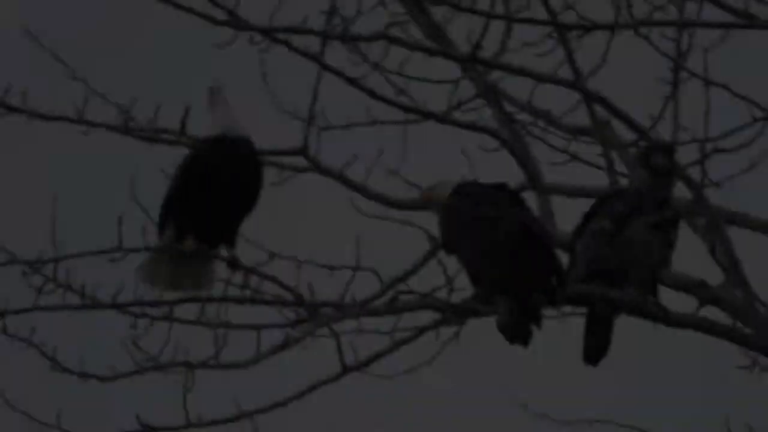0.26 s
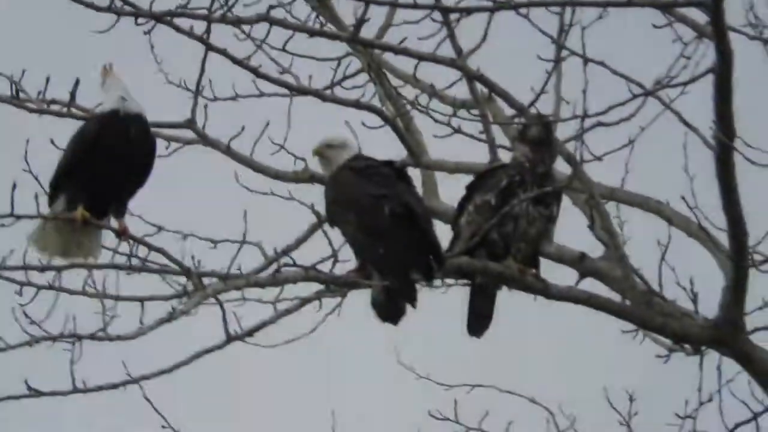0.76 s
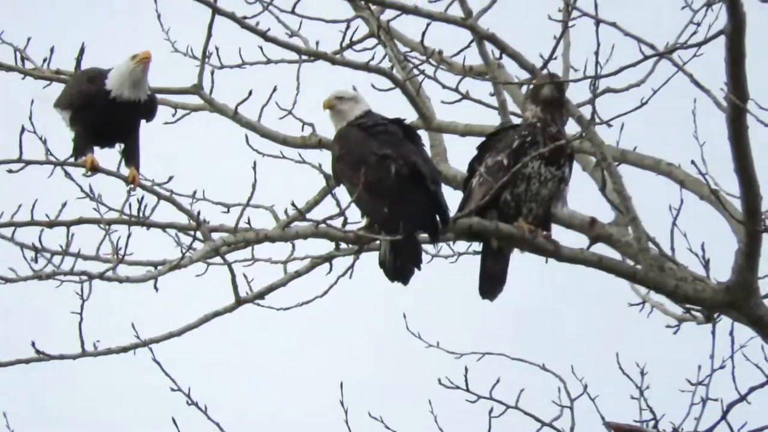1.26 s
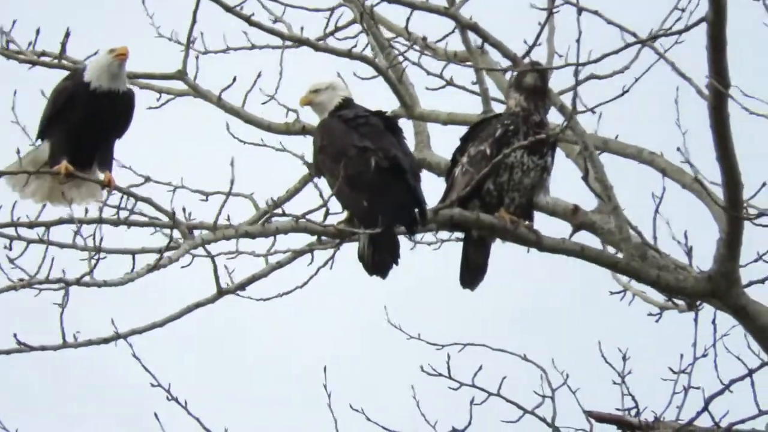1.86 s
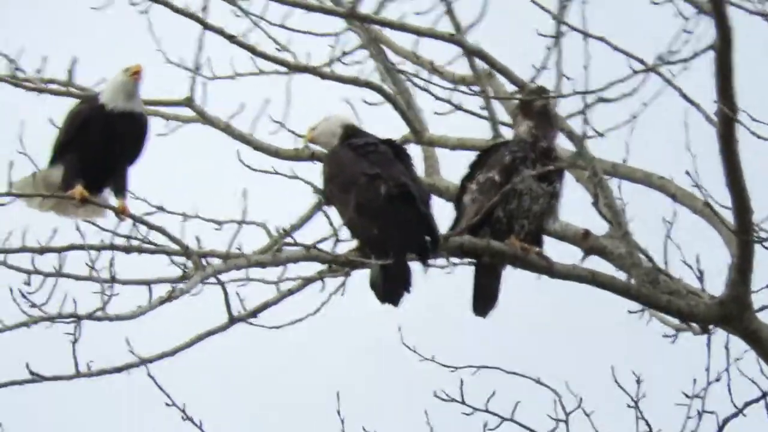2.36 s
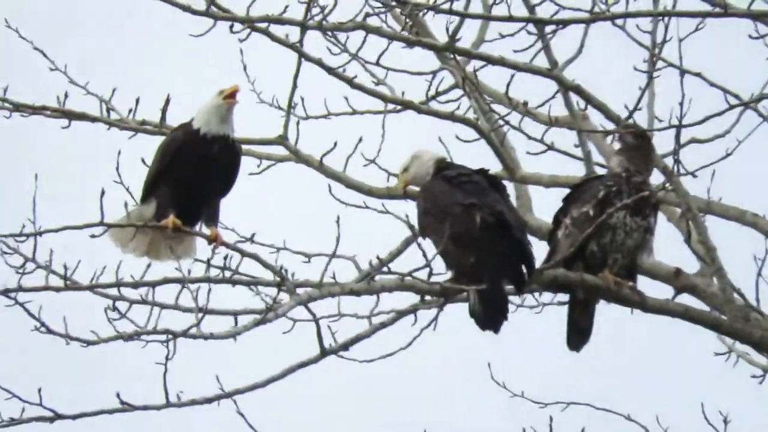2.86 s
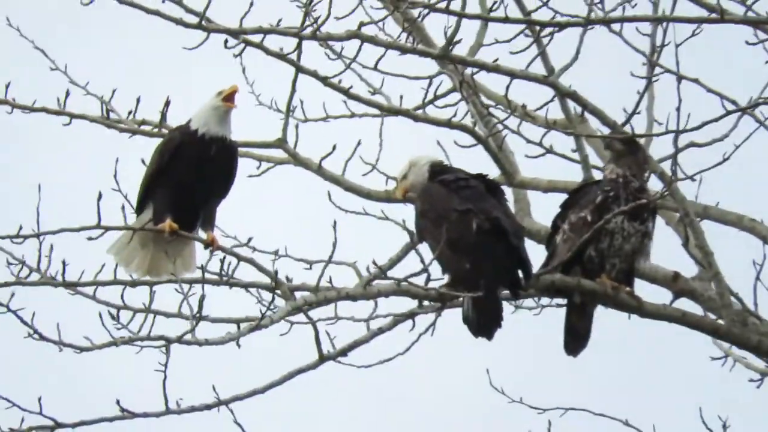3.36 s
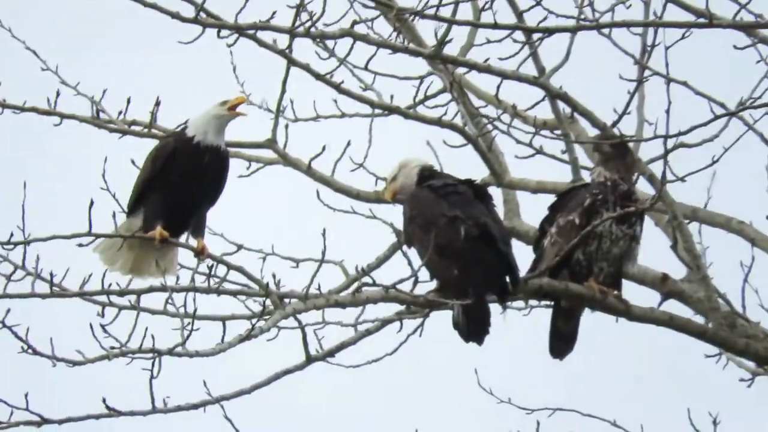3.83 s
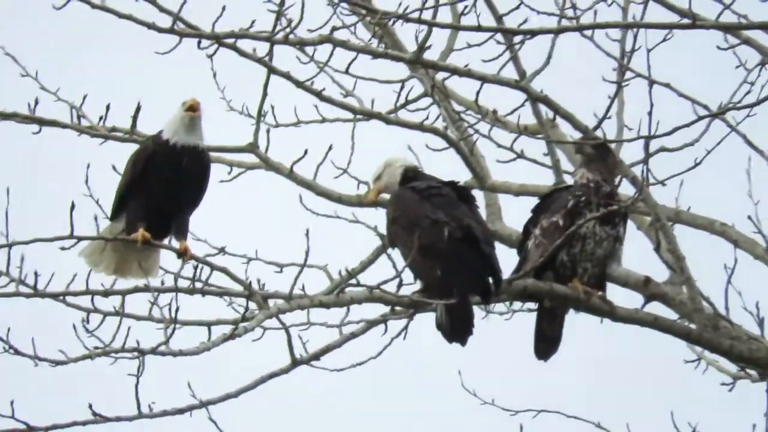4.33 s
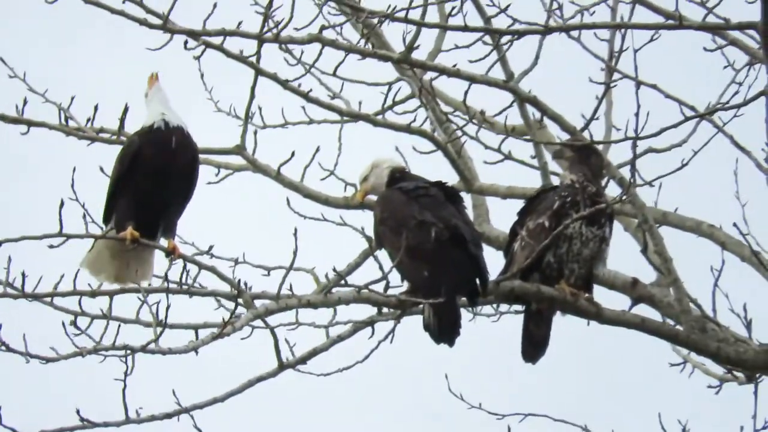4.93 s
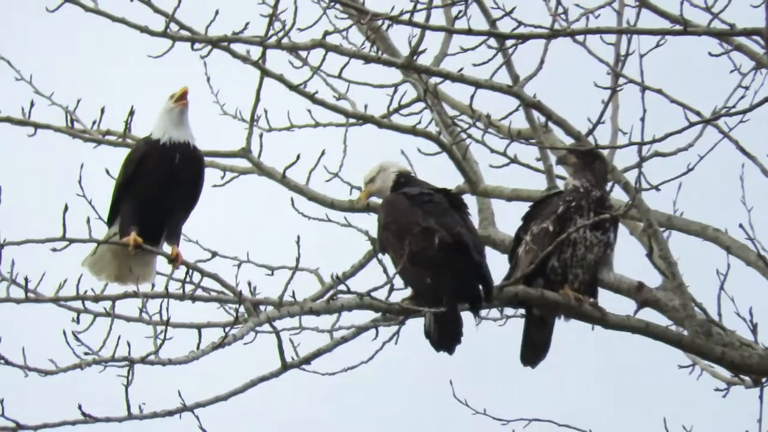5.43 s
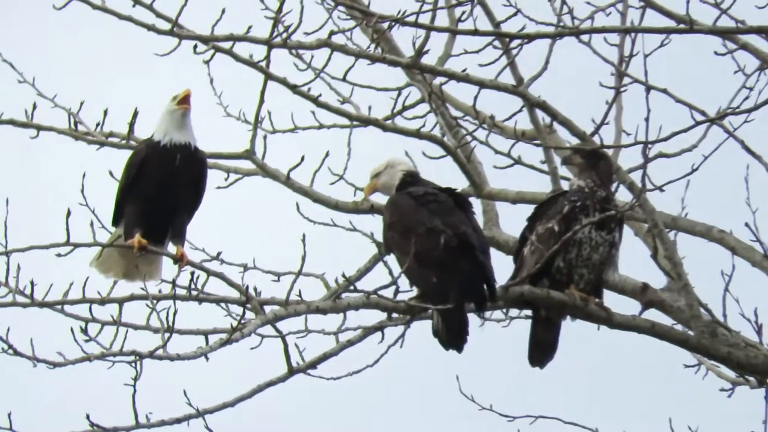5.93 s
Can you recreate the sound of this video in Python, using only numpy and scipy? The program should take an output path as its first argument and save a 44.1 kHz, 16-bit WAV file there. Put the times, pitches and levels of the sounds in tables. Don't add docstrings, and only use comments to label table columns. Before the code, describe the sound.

Silence at first, then from 0.1 to 1.1 s a wide, low distant-traffic roar fades up and holds to the end at about 6 s, with faint engine hum and soft deep throbs swelling irregularly, strongest near 3.5 s and 4.5-5 s. In the centre, a bald eagle begins with faint airy hisses, then short, raspy two-note chirps rising into squeaks at 0.63, 0.86, 1.1 and, loudest, 1.4 s. Only traffic until 3.2 s, when small chirps restart; from 3.6 to 4.25 s comes a dense, loud bout of piercing whistles around 3-4 kHz with a wavering scream at 3.65-3.93 s. Isolated pips follow at 4.4 and 4.7 s. From 4.95 s harder chirps return, clearest at 5.4 s, thinning afterwards. Brief hoarse clucks from a lower bird occur from 3.3 s, mostly after 4.2 s. Notes bounce off nearby trunks with a short, scattered woodland tail.

```python
import sys
import numpy as np
from scipy import signal
from scipy.io import wavfile
from scipy.ndimage import uniform_filter1d

SR = 44100
rng = np.random.default_rng(int(sys.argv[2]) if len(sys.argv) > 2 else 0)


def put_to_file(sound):
    columns = np.atleast_2d(sound).T
    safe = np.clip(columns, -1, 1)
    whole_steps = np.round(safe * 32767)
    wavfile.write(sys.argv[1], SR, whole_steps.astype(np.int16))


def volts_from_db(level):
    exponent = np.asarray(level, float) / 20
    return 10 ** exponent


N = 272979


def read(points, hz):
    f, value = np.transpose(points)
    return np.interp(np.log(hz + 1), np.log(f + 1), value)


def evened(x):
    return x / np.sqrt(np.mean(x ** 2) + 1e-20)


def smoothed_twice(x, size, axis=-1):
    return uniform_filter1d(uniform_filter1d(x, size, axis), size, axis)


def add(mix, s, sound):
    part = mix[round(s * SR):][:len(sound)]
    part += sound[:len(part)]


def resonate(x, hz, width):
    turn = np.exp(2j * np.pi * hz * np.arange(len(x)) / SR)
    r = np.exp(-np.pi * width / SR)
    return 2 * (turn * signal.lfilter([1 - r], [1, -r], x / turn)).real


def road_roar():
    # frequency in Hz, level in dB per Hz.
    road_spectrum = [(15, -32), (25, -13.5), (45, -7.5), (134, -8.5), (215, -8), (353, -9), (565, -14.5),
                     (810, -11.5), (1050, -18), (1750, -28.5), (3000, -32.5), (6000, -41), (11000, -51),
                     (15000, -62)]
    # frequency in Hz, left-right likeness from -1 to 1.
    likeness = [(40, 1.0), (90, 1), (150, 0.6), (290, -0.35), (630, 0.58), (1370, 0.24), (3000, -0.32),
                (8000, -0.2), (13000, -0.49)]
    frames, hz = N // 256 + 5, np.fft.rfftfreq(1024, 1 / SR)
    a, b, c, d, patches = rng.standard_normal((frames, 513, 5)).T
    patches = evened(uniform_filter1d(uniform_filter1d(patches, 14, 0), 16, 1))
    flicker = evened(uniform_filter1d(rng.standard_normal(frames), 8))
    same = np.clip(read(likeness, hz), -1, 1)[:, None]
    left = a + 1j * b
    right = same * left + np.sqrt(1 - same ** 2) * (c + 1j * d)
    level_db = read(road_spectrum, hz)[:, None] + 0.79 * patches + 0.79 * flicker
    spectra = np.array([left, right]) * volts_from_db(level_db)
    roar = evened(signal.istft(spectra, nperseg=1024, noverlap=768)[1][:, :N])
    return roar * volts_from_db(-44)


def engine_hum():
    # frequency in Hz, width in Hz, level in dB.
    drones = [(126.8, 20, -55), (425.8, 9.4, -59.5)]
    return sum(volts_from_db(db) * evened(resonate(rng.standard_normal(N), hz, width)) for hz, width, db in drones)


def engine_throb():
    # moment of passing in seconds, swell time in seconds, level in dB.
    passes = [(1.0, 0.33, -57), (1.64, 0.036, -51), (1.93, 0.24, -48.5), (2.77, 0.096, -46),
              (3.2, 0.21, -52.5), (3.521, 0.057, -40.5), (4.56, 0.097, -44.5), (4.92, 0.039, -45),
              (5.3, 0.086, -52.5), (5.78, 0.02, -51), (6.0, 0.065, -48)]
    idle_db, throb_hz, width_hz = -55, 69.5, 26
    t = np.arange(N) / SR
    throb = resonate(rng.standard_normal(N), throb_hz, width_hz)
    throb = evened(resonate(throb, throb_hz, width_hz))
    swells = sum(volts_from_db(db) * np.exp(-((t - s) / swell) ** 2) for s, swell, db in passes)
    return throb * (volts_from_db(idle_db) + swells)


def traffic():
    return road_roar() + engine_hum() + engine_throb()


def scatter_db(t):
    wood_end_s, stand_s = 0.67, 0.101
    near = volts_from_db(7 - 170 * t)
    beyond_s = np.maximum(t - wood_end_s, 0)
    far = volts_from_db(-7 - 42.5 * t - 68 * beyond_s)
    rows_of_trees_db = 6 * np.cos(2 * np.pi * t / stand_s)
    return 20 * np.log10(np.hypot(near, far)) + rows_of_trees_db


def trees(x):
    # delay in seconds, level in dB.
    trunks = [(.019, -8.5), (.028, -15.5), (0.034, -10), (.061, -16.5), (.069, -16), (.1, -25.5),
              (.128, -25)]
    taps = np.zeros((2, SR))
    at = np.arange(300, SR - 20, 20) + rng.integers(0, 20, (2, (SR - 301) // 20))
    np.put_along_axis(taps, at, rng.choice([-1., 1.], at.shape), 1)
    clumps = evened(smoothed_twice(rng.standard_normal(SR), 300))
    taps = taps + 0.47 * taps[::-1]
    taps *= volts_from_db(5.3 * clumps + scatter_db(np.arange(SR) / SR) - 37.5)
    for delay, db in trunks:
        taps[[0, 1], round(delay * SR) + rng.integers(0, 3, 2)] += volts_from_db(db)
    dull = signal.lfilter(*signal.butter(2, 8500, fs=SR), taps)
    return signal.fftconvolve(x[None], dull, axes=1)[:, :N]


def clucks():
    # start in seconds, length in seconds, pitch in Hz, level in dB, side resonances in dB.
    cluck_rows = [ (3.272, 0.034, 408, -69, 6), (4.198, 0.013, 428, -64, 15), (4.231, 0.0097, 413, -50, 7),
                  (4.248, 0.025, 446, -49.5, 2), (4.425, 0.024, 418, -63, 12),
                  (4.489, 0.011, 429, -61.5, 14.5), (4.758, 0.019, 427, -58, 8),
                  (5.044, 0.0097, 409, -49, 4), (5.254, 0.015, 413, -55.5, 4), (5.295, 0.01, 409, -52, -3),
                  (5.483, 0.012, 412, -53, 3), (5.528, 0.015, 406, -51, -5), (5.758, 0.018, 406, -55.5, 0),
                  (5.964, 0.049, 449, -66, 9.5), (5.996, 0.014, 423, -51, -9), ]
    # frequency in Hz, width in Hz, level in dB.
    mouth = (1699, 256, 11.9)
    # frequency in Hz, width in Hz, level in dB.
    throat = [(1340, 250, 3), (2180, 250, -3), (2620, 250, -8)]
    main, side = np.zeros((2, N))
    for s, length, hz, level_db, side_db in cluck_rows:
        t = np.arange(0, length, 1 / SR)
        folds = sum(np.cos(2 * np.pi * k * hz * t) for k in range(1, 9))
        breath = 1.5 * rng.standard_normal(3000)[:len(t)]
        drive = volts_from_db(level_db) * (folds + breath) * np.hanning(len(t))
        add(main, s, drive)
        add(side, s, drive * volts_from_db(side_db))
    paths = [(main, mouth)] + [(side, mode) for mode in throat]
    return sum(volts_from_db(db) * resonate(resonate(x, hz, width), hz, width) for x, (hz, width, db) in paths)


def syrinx(hz, level_db, window, rasp_hz):
    shake = rng.standard_normal((2, 15000))
    slow = signal.lfilter(*signal.butter(2, max(rasp_hz, 10) / 2, fs=SR), shake)[:, 2000:]
    share = np.clip(rasp_hz / 250, 0, 1)
    swing = np.sqrt(1 - share) + np.sqrt(share / 2) * np.dot([1, 1j], evened(slow))[:len(hz)]
    turn = np.exp(2j * np.pi * np.cumsum(hz) / SR)
    flutter = evened(smoothed_twice(shake[0], 100))[:len(hz)]
    octave = volts_from_db(-34 + 2.5 * (4000 - hz) / 1000 + 4.0 * flutter)
    return np.sqrt(2) * volts_from_db(level_db) * window * (swing * (turn + octave * turn ** 2)).real


def call(s, chip_db, slide_db, squeak_db, squeak_hz):
    # delay in seconds, length in seconds, from Hz, to Hz, rasp in Hz.
    lead_out = (.02, 0.0312, 3560, 3950, 430)
    delay, length, from_hz, to_hz, slide_rasp_hz = lead_out
    clear_db = -45.5
    chip_hz = 3560 + 7.5 * (chip_db - clear_db)
    chip_rasp_hz = 39 + 26 * max(clear_db - chip_db, 0)
    squeak_at, squeak_s, top_hz = s + .031, .06, squeak_hz + 178.4
    return [(s, .023, chip_hz, chip_hz + 30, chip_db, chip_rasp_hz),
            (s + delay, length, from_hz, to_hz, slide_db, slide_rasp_hz),
            (squeak_at, squeak_s, squeak_hz, top_hz, squeak_db, 196),
            (squeak_at + 0.39 * squeak_s, 0.14, top_hz - 40, top_hz, squeak_db - 19, 60)]


def chirps():
    # start in seconds, chip in dB, hoarse slide in dB, squeak in dB, squeak in Hz.
    chatter = [
        (0.633, -55.5, -63, -60.5, 4380),
        (.862, -54, -61, -58, 4420),
        (1.115, -57, -63, -62.5, 4510),
        (1.396, -45, -53.5, -56, 4510),
        (4.981, -55, -59, -58, 4460),
        (5.219, -44.5, -58, -56, 4476),
        (5.425, -38.5, -49, -54.5, 4550),
    ]
    # start in seconds, length in seconds, from Hz, to Hz, level in dB.
    pips = [(1.19, .015, 3490, 3510, -59), (3.248, 0.031, 2610, 2770, -52.5),
            (3.278, 0.021, 2734, 2555, -43), (3.3, 0.17, 2693, 2727, -63.5),
            (3.542, .01, 3680, 3660, -57.5), (3.586, 0.024, 3100, 3250, -53),
            (3.612, .014, 3740, 3640, -56), (3.743, 0.028, 4800, 4720, -36),
            (4.004, 0.0076, 3950, 3670, -33), (4.008, 0.021, 3274, 2810, -39.5),
            (4.2, 0.013, 6300, 4870, -57), (4.408, 0.0095, 3100, 3230, -47),
            (4.708, .015, 3070, 3067, -38.5), (4.758, .11, 3100, 3043, -61.5),
            (4.977, 0.019, 3060, 3210, -50), (5.062, 0.016, 5345, 5380, -56.5),
            (5.082, 0.12, 5380, 5320, -74), (5.09, 0.017, 3840, 4080, -63.5), (5.23, .018, 3150, 3180, -51),
            (5.238, 0.012, 3560, 3560, -46), (5.293, .02, 3940, 3950, -61),
            (5.497, .017, 4100, 3990, -62.5), (5.941, .012, 3200, 3180, -59)]
    # start in seconds, length in seconds, from Hz, to Hz, level in dB.
    creaks = [(.445, 0.03, 7400, 5700, -68), (.458, .04, 5200, 5200, -64), (1.126, 0.026, 3270, 2940, -63),
              (1.131, 0.037, 5230, 5230, -66), (3.282, 0.015, 2530, 2050, -57),
              (3.742, .036, 5180, 5280, -71), (4.958, 0.026, 2900, 3650, -55),
              (5.204, 0.0175, 2490, 3700, -54.5), (5.416, 0.0173, 2820, 3430, -55.5),
              (5.231, 0.013, 5050, 5200, -69), (5.684, 0.024, 2990, 4090, -58.5),
              (5.916, 0.033, 3170, 4010, -63), (5.979, 0.013, 3560, 3120, -63)]
    # start in seconds, length in seconds, from Hz, to Hz, level in dB.
    hisses = [(.35, .055, 4660, 4370, -58), (.365, 0.019, 3600, 3170, -54.5),
              (.467, 0.062, 3200, 2200, -60), (3.235, 0.024, 2488, 3560, -60),
              (4.228, .081, 2300, 2022, -57), (4.747, 0.061, 2376, 1890, -59.5),
              (5, 0.036, 4200, 5230, -64)]
    glides = [part for row in chatter for part in call(*row)]
    for rows, rasp_hz in [(pips, 60), (creaks, 380), (hisses, 1020)]:
        glides += [(*row, rasp_hz) for row in rows]
    return glides


def whistles():
    # turning point in seconds, pitch in Hz, effort in dB.
    screams = [
        [(3.655, 3725, -36), (3.68, 4110, -30.5), (3.712, 3995, -31), (3.73, 4124, -34.5), (3.747, 4270, -35.5)],
        [(3.77, 4210, -33.5), (3.787, 3930, -34), (3.805, 3980, -37), (3.825, 4130, -29.5), (3.846, 4143, -32),
         (3.862, 3802, -31.5), (3.89, 3950, -31.5), (3.92, 4044, -35.5), (3.933, 3580, -37)],
    ]
    # share of length, share of pitch range, dB under the top.
    scoop = [(0, 0.04, -12.5), (.3, 0.586, -12), (.55, 0.98, -5), (.8, .85, -1.5), (1, 0.77, -25)]
    # share of length, share of pitch range, dB under the top.
    yodel = [(0, 0.325, -13.5), (.45, 0, -17.5), (.8, .4, 0.5), (1, 1, -17)]
    # start in seconds, length in seconds, low Hz, top Hz, level in dB.
    scooped = [
        (3.58, 0.03, 3970, 4400, -53.5),
        (3.973, 0.034, 3880, 4010, -34.5),
        (4.05, 0.0471, 2740, 3120, -27.5),
        (4.177, 0.063, 2720, 2955, -33.5),
    ]
    # start in seconds, length in seconds, low Hz, top Hz, level in dB.
    yodelled = [
        (3.624, 0.0348, 2960, 3390, -27),
        (3.931, .046, 2925, 3450, -27.5),
    ]
    curves = list(screams)
    for rows, shape in [(scooped, scoop), (yodelled, yodel)]:
        for s, length, low, top, db in rows:
            curves.append([(s + u * length, low + rise * (top - low), db + under) for u, rise, under in shape])
    return curves


def eagle():
    # frequency in Hz, level in dB.
    skyward = [(2700, -2), (3100, -1), (3450, -2.5), (3650, -5), (3900, 2.5), (4700, 1.5), (5400, 4.5),
               (5650, -12)]
    out, sent = np.zeros((2, N))
    for rows in whistles():
        s, hz, level_db = np.transpose(rows)
        t = np.arange(s[0], s[-1], 1 / SR)
        hz = uniform_filter1d(np.interp(t, s, hz), 250)
        level_db = uniform_filter1d(np.interp(t, s, level_db), 150)
        from_end = np.minimum(t - s[0], s[-1] - t)
        edge = np.sin(np.pi / 2 * np.clip(from_end / 0.0029, 0, 1)) ** 2
        note = syrinx(hz, level_db, edge, rasp_hz=16)
        add(out, s[0], note)
        add(sent, s[0], note * volts_from_db(read(skyward, hz)))
    for s, length, start_hz, end_hz, level_db, rasp_hz in chirps():
        count = int(length * SR)
        puff = signal.windows.tukey(count, .6)
        chirp = syrinx(np.linspace(start_hz, end_hz, count), level_db, puff, rasp_hz)
        add(out, s, chirp)
        add(sent, s, chirp * volts_from_db(read(skyward, (start_hz + end_hz) / 2)))
    return out, sent


def scene():
    road = traffic()
    low_bird = clucks()
    direct, sent = eagle()
    return road + trees(sent + volts_from_db(-3.5) * low_bird) + low_bird + direct


def roll_off(x):
    return signal.sosfilt(signal.butter(12, 14850, fs=SR, output="sos"), x)


def record(dry):
    fade_start_s, fade_s, fade_bend, edge_hz = .102, 1, 0.96, 14600
    fade = np.clip((np.arange(N) / SR - fade_start_s) / fade_s, 0, 1) ** fade_bend
    limited = signal.oaconvolve(dry * fade, signal.firwin(255, edge_hz, fs=SR)[None], "same")
    return roll_off(limited)


dry = scene()
out = record(dry)
put_to_file(out)
```